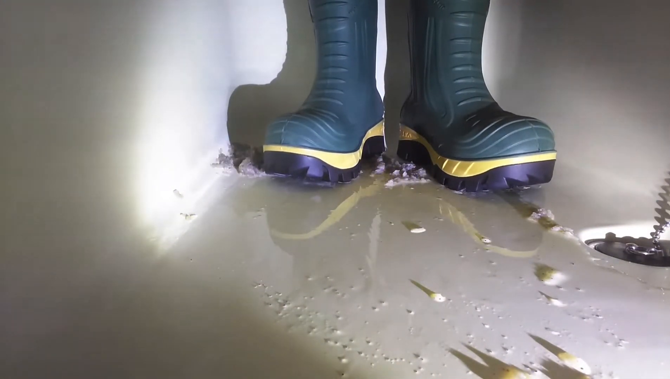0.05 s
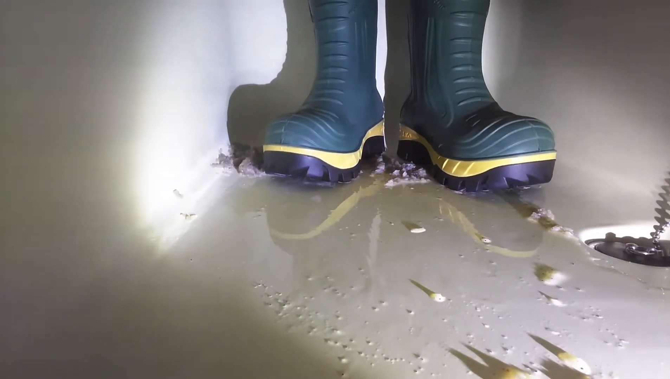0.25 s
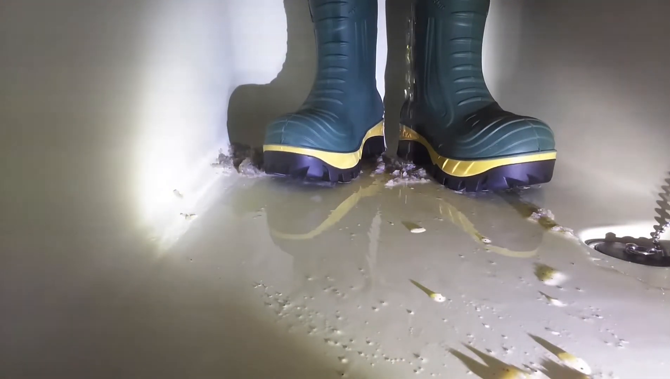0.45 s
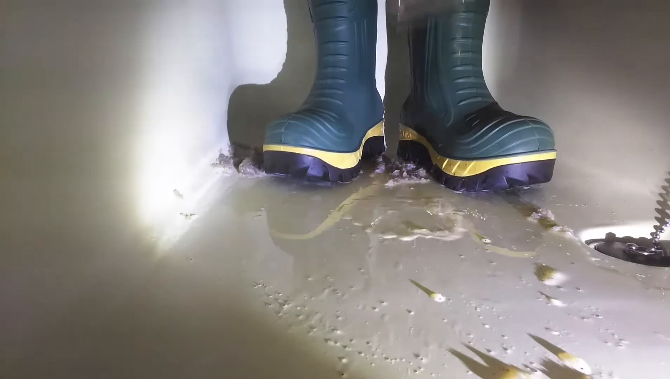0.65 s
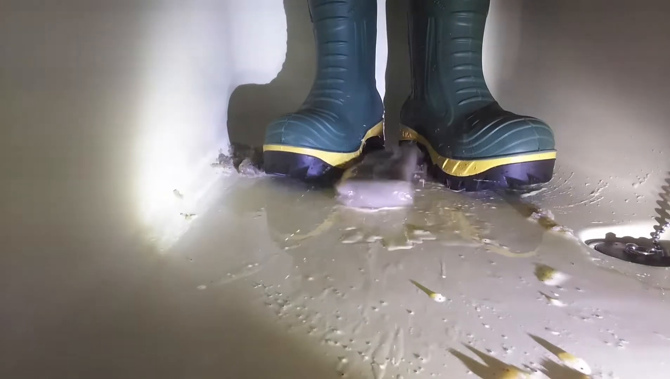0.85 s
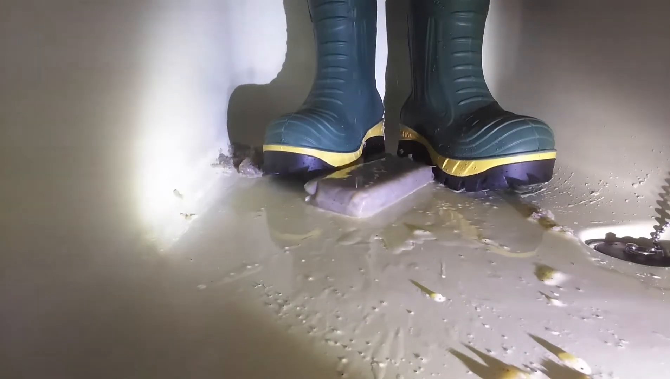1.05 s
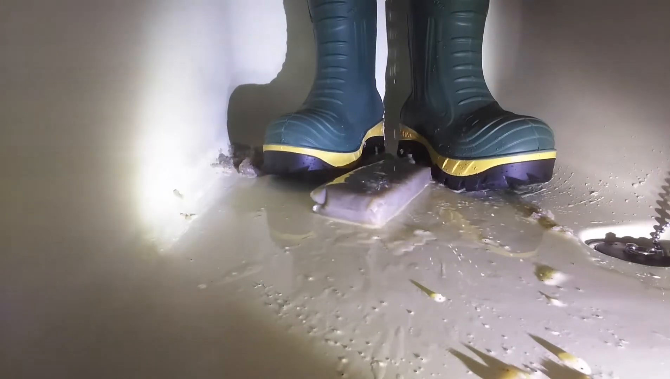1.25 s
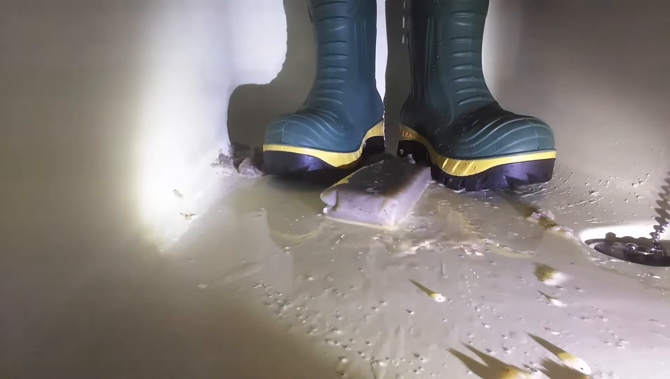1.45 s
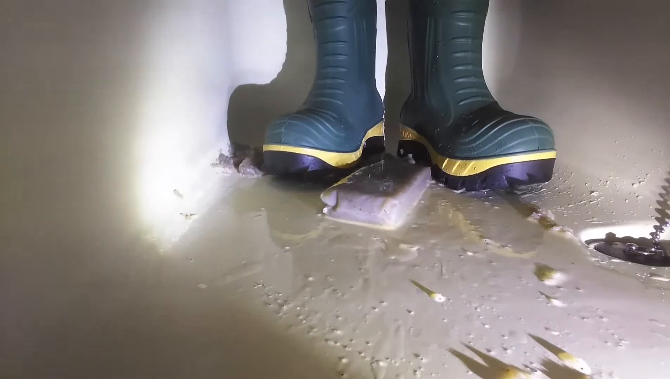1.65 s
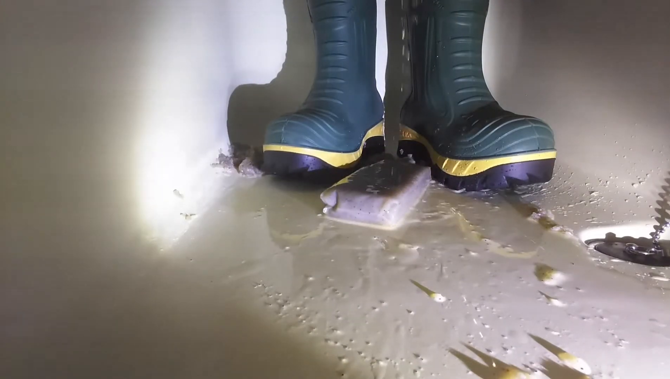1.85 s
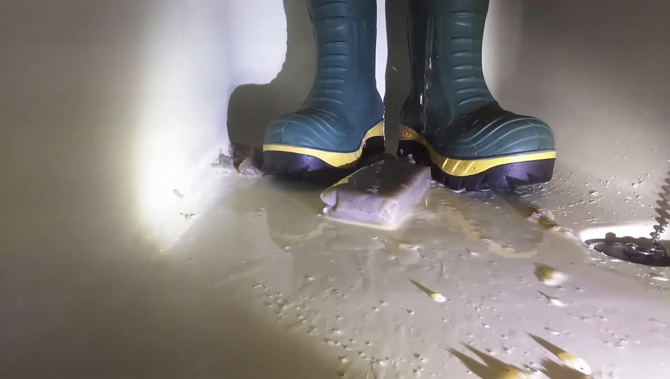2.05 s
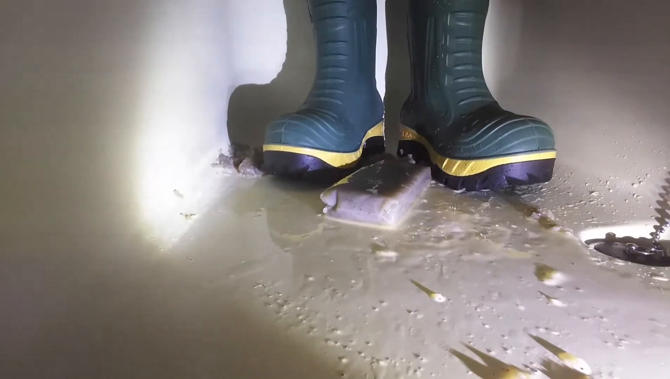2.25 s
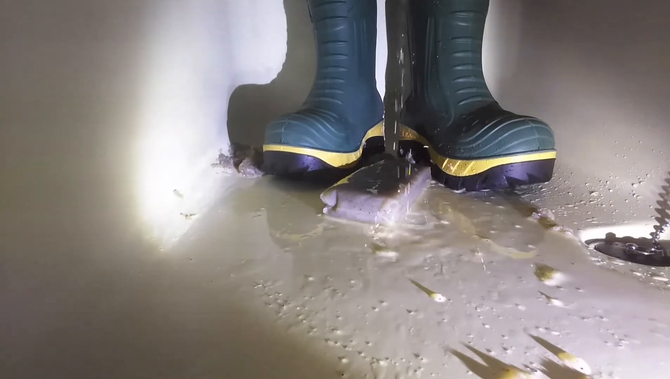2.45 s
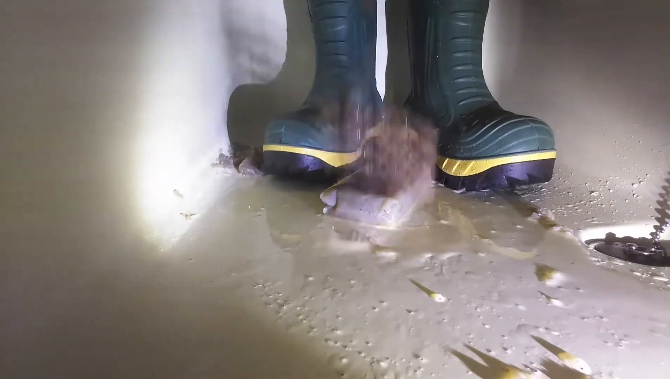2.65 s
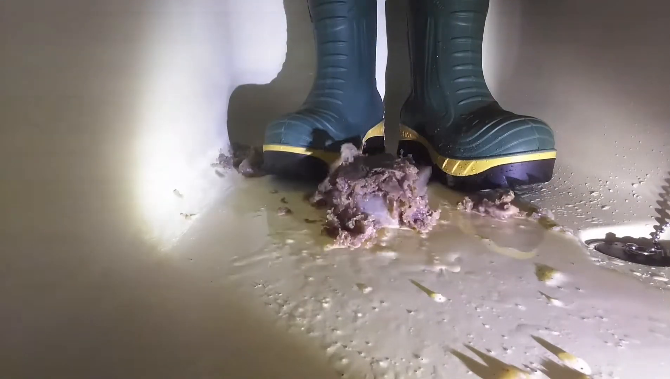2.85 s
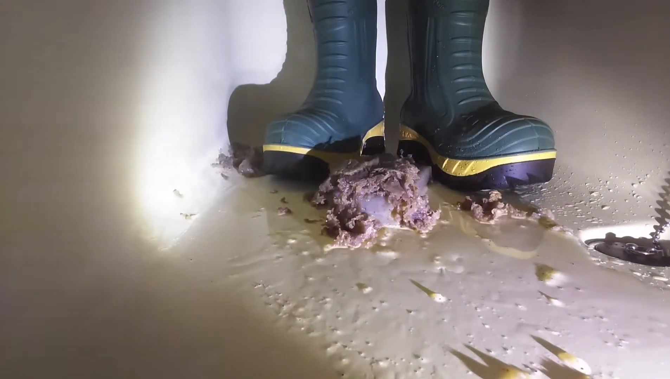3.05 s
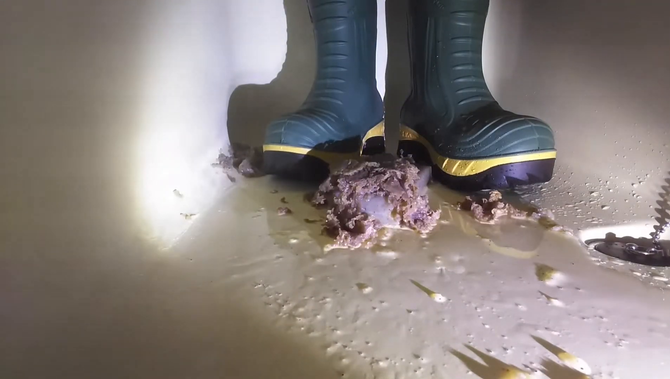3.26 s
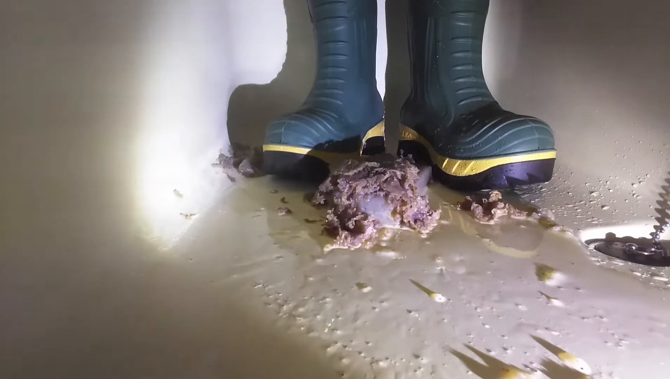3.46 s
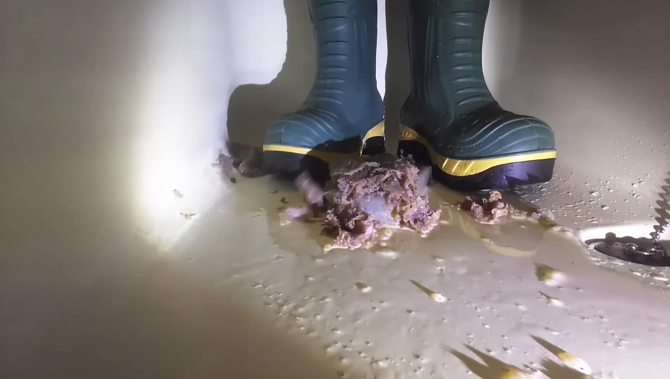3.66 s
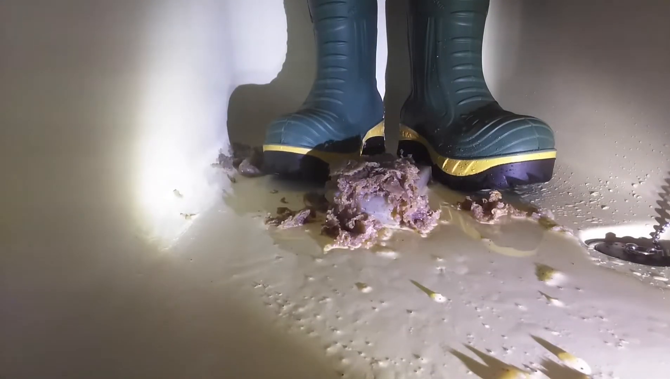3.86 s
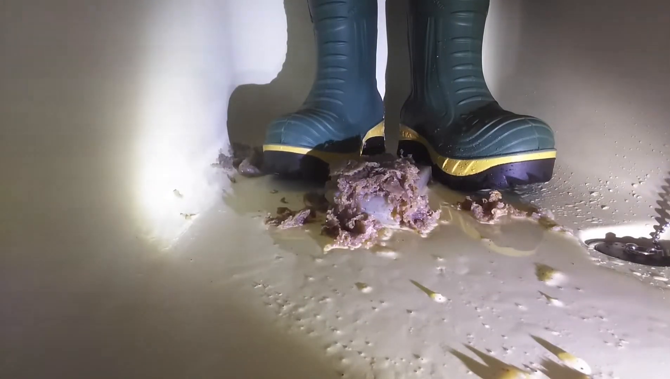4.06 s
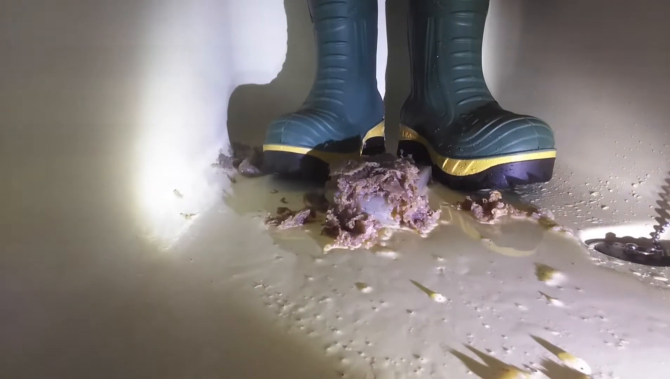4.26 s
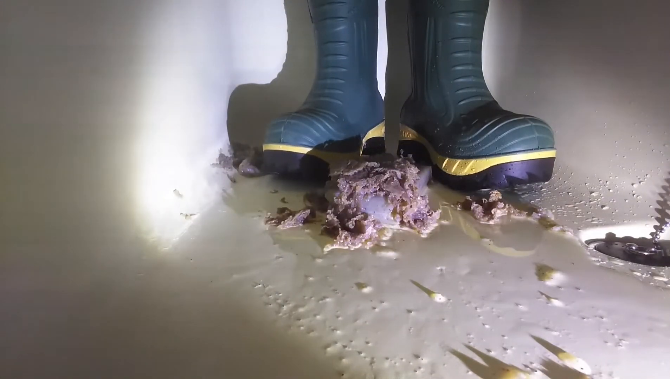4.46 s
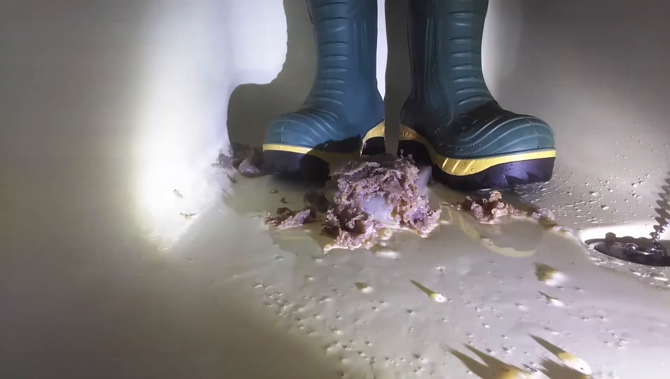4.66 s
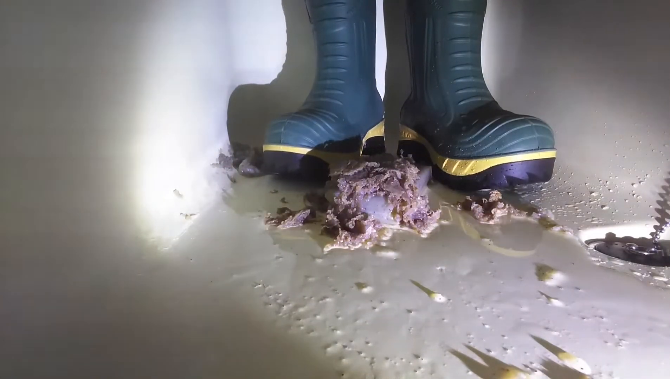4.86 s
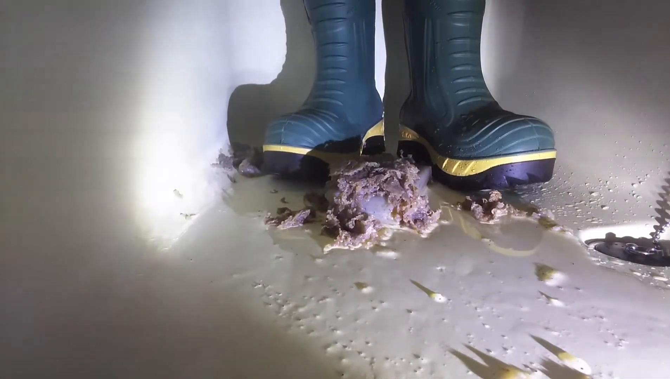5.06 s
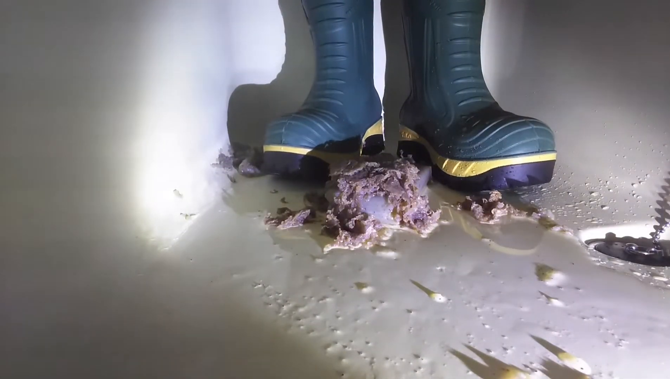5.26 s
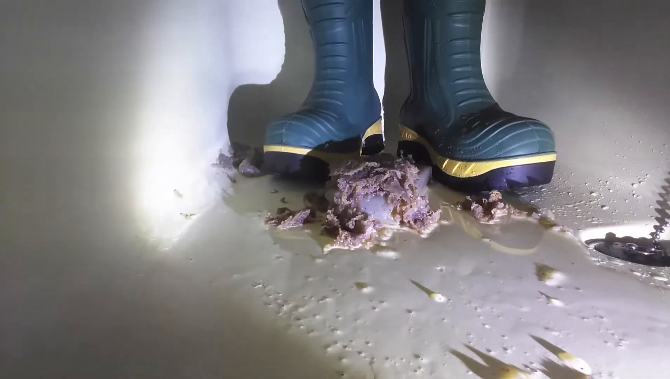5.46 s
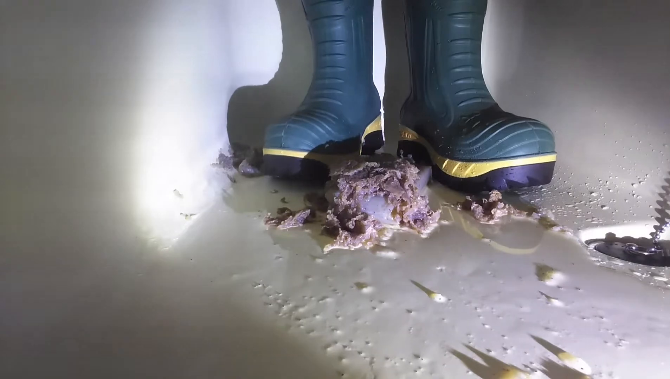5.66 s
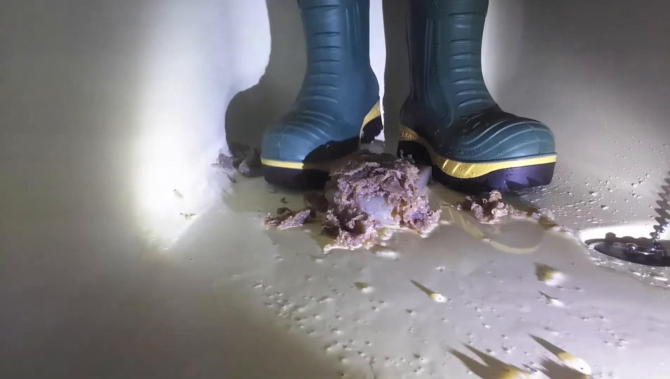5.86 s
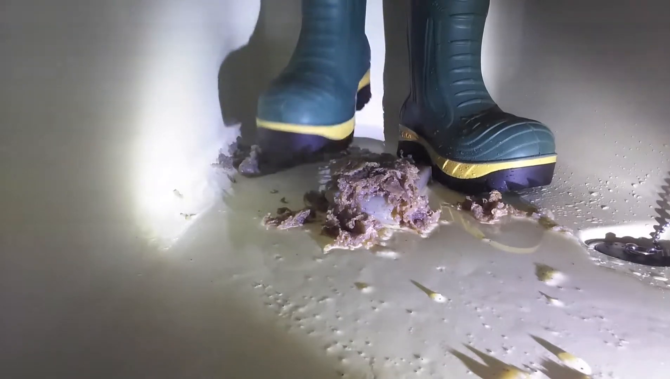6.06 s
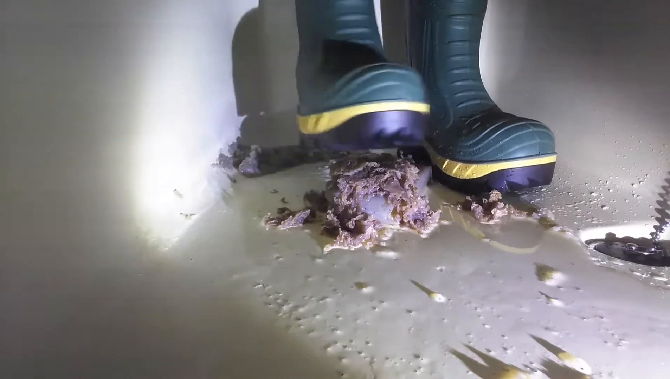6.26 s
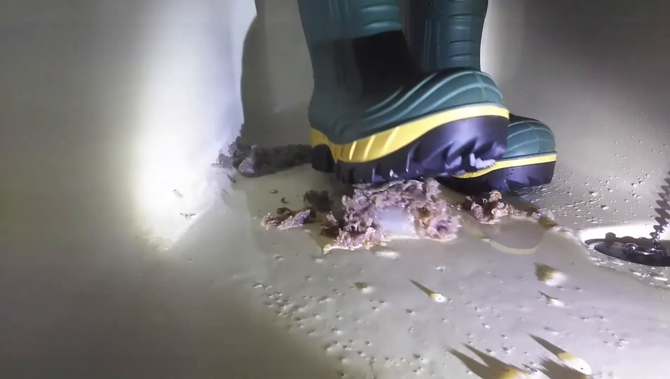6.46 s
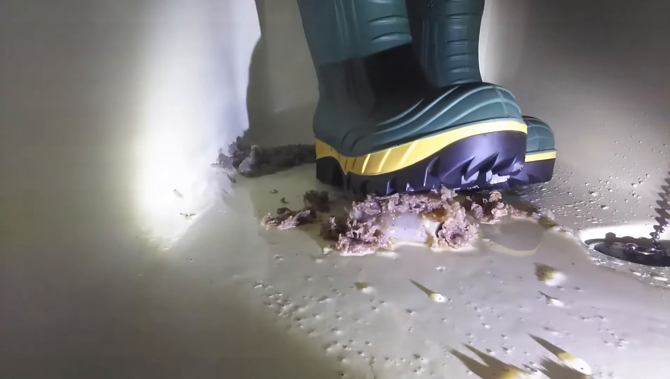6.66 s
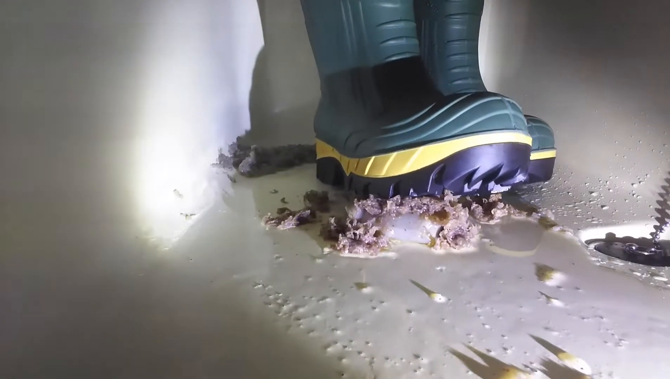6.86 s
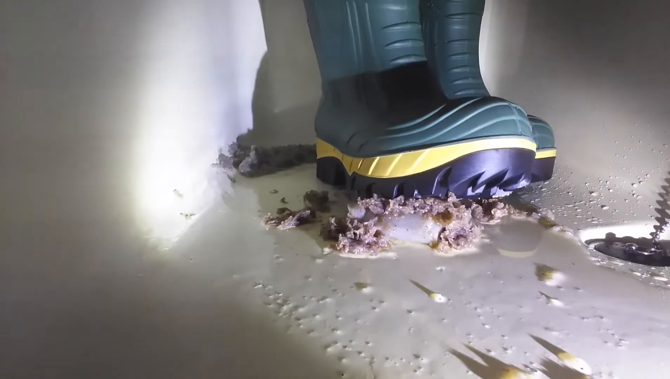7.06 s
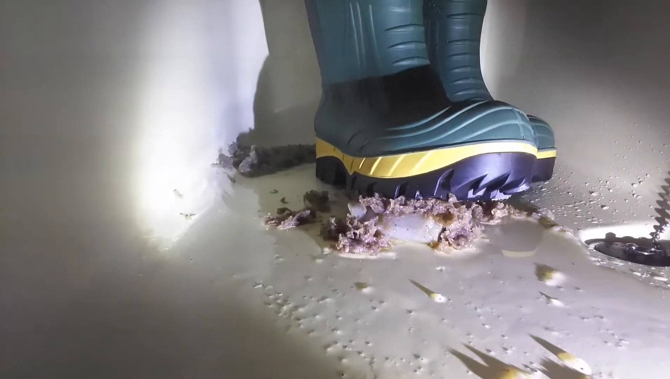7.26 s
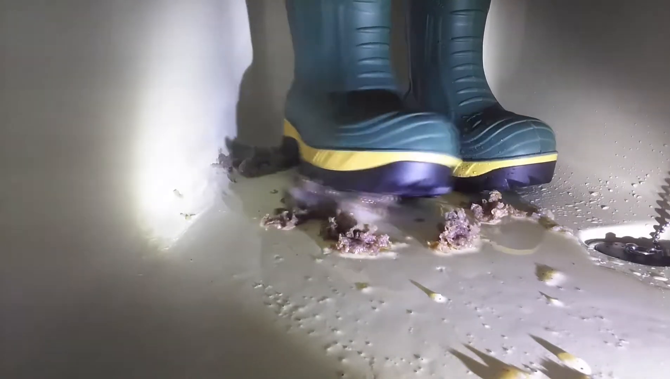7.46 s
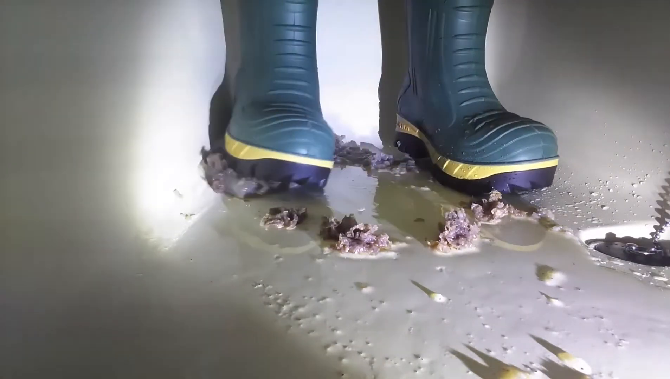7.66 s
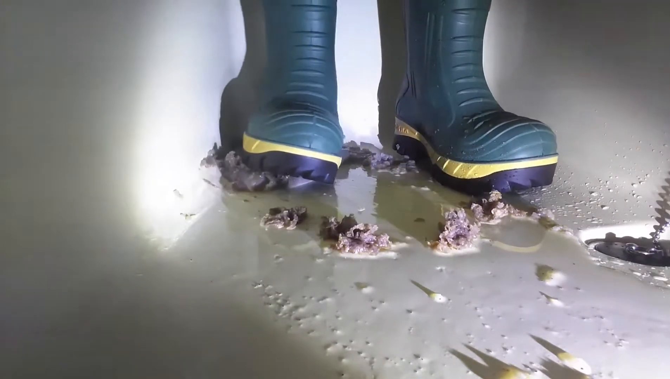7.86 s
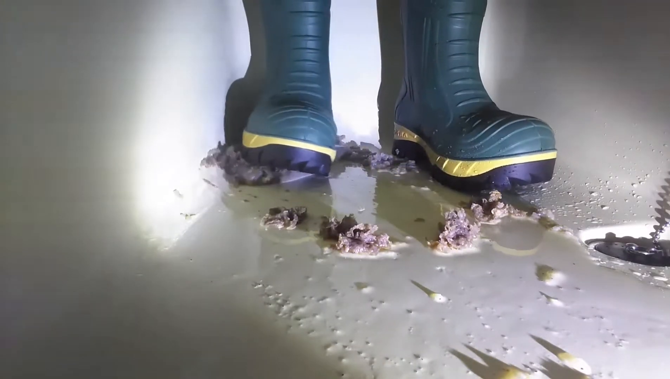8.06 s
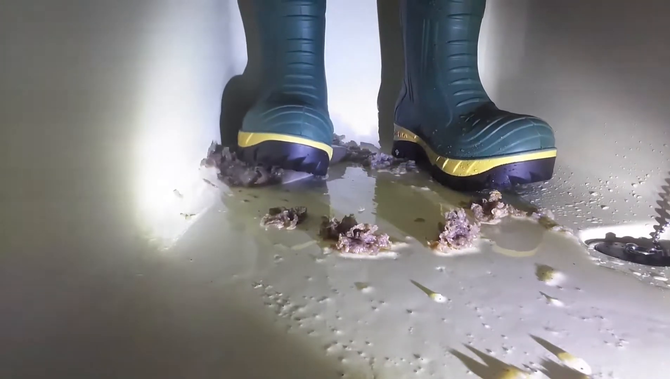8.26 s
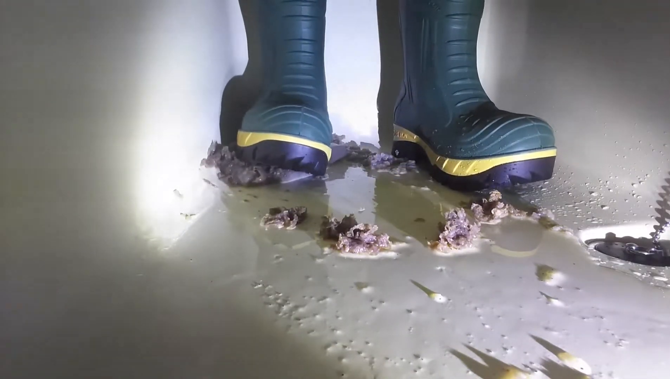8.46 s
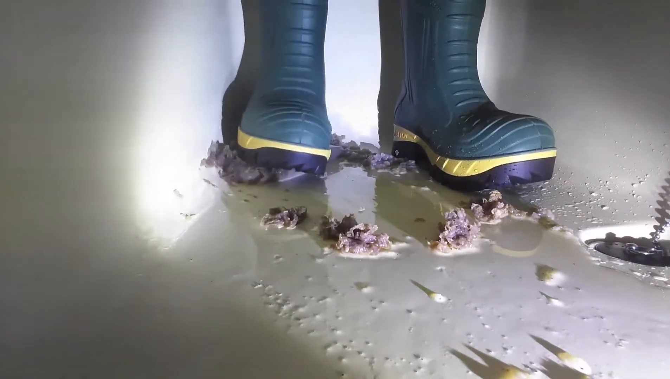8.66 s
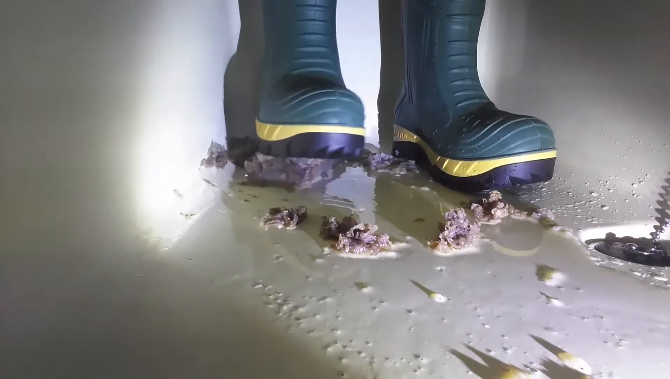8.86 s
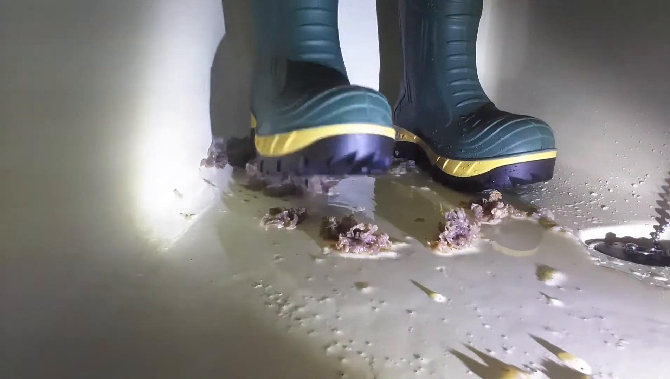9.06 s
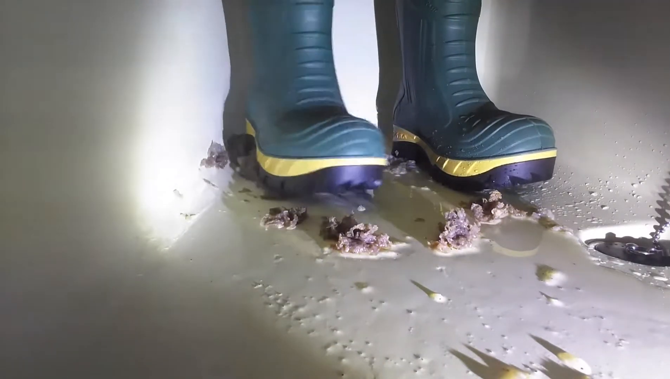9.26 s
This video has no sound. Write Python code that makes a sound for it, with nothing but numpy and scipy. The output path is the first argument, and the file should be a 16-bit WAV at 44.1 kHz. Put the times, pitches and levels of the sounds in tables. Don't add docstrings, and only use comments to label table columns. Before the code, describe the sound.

A small stereo camera microphone hears wet food falling into a bathtub: juicy slap, scattered clicking drips, then another loud splat. Sparse drops follow, then thin tin clatters on the tub floor. Rubber presses into mush, air pockets gulping and popping, before the sole pulls free and lands in soft hollow steps. Short scuffs end it. Bright tile echo, quiet hum and slight hiss surround everything.

```python
import sys
import numpy as np
from scipy import signal
from scipy.fft import rfft, irfft, next_fast_len
from scipy.io import wavfile
from scipy.ndimage import uniform_filter1d, map_coordinates

SR = 44100
rng = np.random.default_rng(int(sys.argv[2]) if len(sys.argv) > 2 else 0)


def generate_wav(sig):
    pcm = np.round(np.clip(np.atleast_2d(sig).T, -1, 1) * 32767).astype(np.int16)
    wavfile.write(sys.argv[1], SR, pcm)


def attenuation_scalar(level_db):
    decades = np.asarray(level_db, float) / 20
    return 10 ** decades


N = 410571

# frequency in Hz, density in dB per Hz.
QUIET = [(26, -45), (45, -4), (129, -12.5), (202, -16), (500, -19.5), (609, -25.5), (1590, -28.5),
         (9090, -33), (16000, -32.5)]
# centre in Hz, width in Hz, level in dB.
WHINE = [(39.4, 4.7, -65), (5070, 320, -74.5)]

# frequency in Hz, density in dB per Hz.
SQUELCH = [(290, -18), (500, 0), (668, -13), (946, 0), (1320, -2), (1970, 3), (2230, -0.5), (2820, 2),
           (3350, -1), (8000, -11.5), (10400, -21), (17600, -120)]
# frequency in Hz, density in dB per Hz.
FIZZ = [(1760, -19), (3000, -20), (3870, -5.5), (7430, -7.5), (9520, -10.5), (11200, -15.5), (14800, -14),
        (15500, -39.5)]
# frequency in Hz, density in dB per Hz.
RUMBLE = [(21, -47), (35, -5), (65, -13), (102, 9), (140, -11.5), (179, -4.5), (276, -5.5), (415, -12.5),
          (540, -21.5), (900, -19), (1170, -22), (1980, -120)]
# peak in seconds, squelch in dB, swell in seconds per 20 dB,
# fade in seconds per 20 dB, fizz over the squelch in dB.
DRIBBLES = [(.47, -51.5, 0.27, 0.49, -5), (.65, -52, 0.21, 0.77, 5), (.81, -44, 0.099, .22, -2),
            (.94, -35.5, 0.027, 0.09, 11.5), (1.1, -75, .22, 0.53, 6), (1.51, -56, 0.66, 1, -23),
            (2.19, -58, 0.12, 0.23, 8.5), (2.45, -51.5, 0.4, 0.37, -6), (2.58, -48.5, 0.33, 0.2, 1),
            (3.12, -72.5, 0.14, 0.34, 17.5), (5.21, -61, 0.51, 0.94, 3)]
# peak in seconds, squelch in dB,
# swell in seconds per 20 dB, fade in seconds per 20 dB, fizz over the squelch in dB.
SQUEEZES = [(5.952, -54.5, 0.25, 0.022, 2), (6.034, -26.5, 0.019, 0.067, -36),
            (6.19, -51.5, 0.72, 0.15, -1), (6.38, -63.5, 0.026, 0.5, 14), (6.57, -31.5, 0.11, 0.2, -5),
            (6.72, -42.5, 0.12, 1, -5), (7.02, -49, 0.96, 1, -3), (7.39, -58, 0.089, 0.68, 8),
            (7.51, -36.5, 0.18, 0.13, -20), (7.64, -41.5, 0.19, 0.23, -10), (7.74, -40.5, 0.45, 0.016, 2),
            (7.898, -62.5, 0.042, 0.089, 14), (8.15, -56.5, 0.25, 0.87, 2), (8.804, -41.5, 0.15, 0.23, 2),
            (9.0, -79, 0.27, 0.86, 23), (9.25, -38, 0.21, 0.33, -3)]
# peak in seconds, rumble in dB, swell and fade in seconds per 20 dB.
SHIFTS = [(.62, -41.5, 0.051, 0.5), (0.811, -19.5, 0.039, 0.22), (0.948, -29.5, 0.3, 0.22),
          (1.3, -53, .45, .3), (1.8, -49.5, 0.83, 1.3), (2.25, -62, 0.81, 1.5), (2.45, -39.5, 0.46, 0.087),
          (5.0, -65, .03, 0.089), (5.25, -58.5, 0.16, 7.9), (5.97, -48.5, 0.1, 0.42), (6.33, -54, 0.2, 0.5),
          (6.67, -37, 0.32, 0.4), (7.161, -49.5, 0.97, 0.69), (7.63, -37, 0.23, 0.14),
          (7.89, -48.5, 0.28, 0.42), (8.38, -52, 0.29, .6), (8.752, -45, 1, 0.13), (9.23, -42.5, 0.44, 0.4)]

# start in seconds, peak in dB, bubble in Hz, dull slap in dB.
PLINKS = [(0.4851, -36, 6140, -19), (0.5125, -29.5, 4720, -22), (2.0497, -25.5, 9750, -45),
          (2.143, -32.5, 7760, -7), (2.589, -30, 9600, -11), (3.9547, -42.5, 4100, -19),
          (4.4192, -49, 9600, -4), (5.2226, -40, 4470, 0), (1.2585, -30, 6100, -4)]
# start in seconds, peak in dB, bubble in Hz, dull slap in dB.
GULPS = [(4.1545, -52, 2060, -24), (5.0498, -46.5, 2370, -26), (5.3497, -45, 2280, 1),
         (6.4894, -34, 3070, -18), (6.5033, -35, 2100, -15), (6.5697, -22.5, 2080, -17),
         (6.598, -33, 2150, -17), (6.627, -38, 2180, -14), (6.6794, -41, 2240, -15),
         (6.7293, -32, 2120, -18), (6.7677, -26, 2980, -17), (6.786, -33.5, 2100, -12),
         (6.875, -35, 2390, -15), (6.9503, -38, 2080, 5), (7.1404, -47, 2780, -16.5),
         (7.1863, -45, 2430, -25), (7.304, -38, 4100, -13), (7.349, -57, 4220, -27),
         (7.3624, -42, 2800, -14), (7.4103, -44, 2820, -10), (7.449, -38.5, 1950, -15),
         (7.4986, -28.5, 1950, -24.5), (7.515, -41, 1920, -5), (7.565, -39, 3200, -17),
         (8.6254, -49.5, 1770, -15), (9.2011, -32.5, 3220, -4)]
# start in seconds, peak in dB, bubble in Hz, dull slap in dB.
SPITS = [(0.4449, -45, 3500, -11), (1.1533, -35.5, 10500, -16), (1.838, -41, 9140, -19),
         (1.8658, -34, 9050, -11), (2.2079, -41, 2080, 7), (2.2284, -28.5, 10500, -10),
         (3.2522, -48, 3990, -34), (3.5272, -51.5, 3800, 1), (1.251, -46, 5500, -15),
         (1.421, -32, 3500, -6), (5.06, -46.5, 11000, -18), (5.352, -40, 5000, 0), (6.355, -47, 10500, -20),
         (8.1055, -50.5, 2700, 14), (8.2636, -46, 3800, 1), (8.4392, -45.5, 1320, 3)]
# start in seconds, peak in dB, bubble in Hz, dull slap in dB.
SPLATS = [(0.5687, -33, 3060, 2), (0.709, -21, 9500, -9.5), (0.7974, -14, 9000, -31),
          (0.8064, -20, 3200, -4), (0.8174, -15, 5270, -3.5), (0.8344, -40, 2470, 2),
          (1.9739, -32, 8400, -6), (1.9869, -30, 8500, -35), (2.7585, -6, 4240, -62),
          (3.6622, -48.5, 3640, 2), (3.683, -32, 7700, -7), (4.4447, -55, 5140, 7)]
# start in seconds, peak in dB, bubble in Hz, dull slap in dB.
SMACKS = [(0.9484, -17.5, 2640, -7.5), (6.3032, -56, 3120, 16), (6.7667, -27, 2200, 0.5),
          (6.8535, -23, 2780, -1.5), (6.8852, -25.5, 2670, -18), (6.99, -23, 2780, -12),
          (7.066, -25.5, 2830, -22), (7.0801, -20, 3730, -8.5), (7.3058, -37, 5380, -28.5),
          (6.5425, -32, 2400, -16), (6.9673, -34, 2590, -15), (7.188, -43, 5000, -20),
          (7.5049, -30, 2800, -3), (7.7423, -26.5, 910, 0)]
# start in seconds, peak in dB, bubble in Hz, dull slap in dB.
TICKS = [(1.27, -34.5, 9000, 0.5), (2.2979, -20, 7600, -22), (2.4346, -28, 4220, 0),
         (2.5437, -29.5, 6950, -7)]
# start in seconds, peak in dB, bubble in Hz, dull slap in dB.
CLACKS = [(0.5135, -46, 5160, -18), (1.4345, -10, 3900, -25), (1.608, -17, 9270, -31),
          (9.2641, -18.5, 4030, -14), (9.271, -37, 4700, -20)]
# its drops, bubble life in cycles, splash share of the peak,
# spray in dB, splash t60 in seconds, echo in dB.
DROP_KINDS = [
    (PLINKS, 21, 0.43, -21.5, 0.031, 0.1),
    (GULPS, 9.8, 0.14, -22, 0.036, -0.9),
    (SPITS, 2.6, 0.2, -11, 0.027, 0.1),
    (SPLATS, 3.26, 0.44, -16.5, 0.035, 0.1),
    (SMACKS, 2.3, 0.51, -22, 0.0084, -2),
    (TICKS, 7.3, 0.77, -9.5, 0.026, -1),
    (CLACKS, 4.4, 0.26, -32, 0.054, -1.2)]

# frequency in Hz, level in dB, t60 in seconds.
TUB = [
    [(98, -3, 0.21), (101.2, 5, 0.46), (120.6, -6, 0.52)],
    [(168.7, -11, 0.3), (180.6, 3, 0.35), (201.2, 1.5, 0.14), (217, -5.5, 0.47)],
    [(263, -5.5, 0.14), (263.5, -3.5, 0.68), (289.6, -8, 0.54), (323.9, -6, 0.5), (346, 3.5, 0.1),
     (394.4, -1, 0.38), (415.4, -3, 0.28), (474, -6.5, 0.51), (563, -6, 0.25)],
]
# start in seconds, strength in dB,
# nearness to the middle in dB, slap in dB.
FALLS = [(0.573, -29.5, -2.5, -6), (0.619, -34.5, -4.5, -14), (0.802, -20, 9.5, -5.5), (0.949, -24, 0, 4.5),
         (1.269, -41, 4, -8), (1.431, -42, -3, -33), (1.504, -37.5, 3, -0.5), (1.62, -46.5, -5, -1),
         (1.848, -47, -1, -4), (1.99, -41.5, 5, -30), (2.138, -38.5, 1.5, -3.5), (2.211, -39, -5.5, 3),
         (2.433, -34.5, 3.5, -4), (2.545, -38.5, -1.5, 0.5), (2.759, -19.5, 2.5, -6), (3.523, -59, -4, 5),
         (3.686, -51.5, 4, 0.5), (4.305, -49, -1.5, -8), (5.57, -37, -4.5, 3), (6.037, -50, -12, -15),
         (6.22, -42, -7.5, 7), (6.28, -48, -10, 14), (7.741, -42.5, -7, 7.5)]
# start in seconds, low drum in dB, second drum over it in dB,
# wall ring over it in dB.
STEPS = [(5.975, -35.5, -1, -7), (6.542, -40, 10, 3), (6.624, -26.5, 3.5, -10), (6.671, -53, -5, -4),
         (6.991, -47.5, 3, -2), (7.463, -36.5, -1, 1.5), (7.509, -37.5, -4, -10), (7.744, -22, -3, -8.5),
         (8.113, -25, -12, -15.5), (8.368, -27, -11, -20.5), (8.45, -40.5, -0.5, -13), (8.71, -50, -4, 5),
         (8.83, -47, -17, -24), (8.9, -44.5, -23, -29), (8.999, -50.5, -13, -17), (9.09, -46, -3, -16),
         (9.199, -42, -5, -12)]

# start in
# seconds, peak in dB, brightness in dB, # fade t60 in seconds.
SCUFFS = [(0.782, -31.5, -5, 0.79), (6.5396, -30.5, -2, 0.13), (7.46, -28, -17, 0.11),
          (8.7063, -21.5, -2.5, 0.028), (9.074, -22.5, 0, 0.017), (9.176, -34.5, 0, 0.21)]

# start in seconds, peak in dB, crack in dB.
TIN_HITS = [(5.548, -31.5, -10.5), (5.557, -25.5, -20), (5.576, -34.5, -15.5), (5.586, -38, -26),
            (5.607, -30, -19), (6.024, -30, -27), (6.033, -23, -30), (6.047, -29, -19.5),
            (6.223, -36.5, -26), (6.277, -56, -22), (6.307, -43.5, -30), (6.371, -55, -12),
            (6.426, -48.5, -17)]
# frequency in Hz, level in dB, t60 in seconds.
TIN_BASE = [(317, -5.5, 0.91), (894, -4, 0.71), (1120, 3.5, 0.26), (1330, 8, 0.23), (1490, 7, 0.27),
            (1798, 7, 0.21), (2530, 6, 0.29), (2800, 3, 0.38), (3110, 16, 0.19), (3200, 21, 0.17),
            (3660, 14.5, 0.13), (4740, 14, 0.24), (5077, 9, 0.19), (9060, 1, 0.048)]
# frequency in Hz, level in dB, t60 in seconds.
TIN_SIDE = [(325, -4.5, 0.95), (395, 5, 0.18), (465, 12.5, 0.061), (540, -10, 0.22), (768, -1.5, 0.54),
            (980, -11, 0.6), (1247, 3, 0.17), (1335, -1, 0.18), (1394, 12, 0.073), (1460, 4, 0.071),
            (1830, -17, .1), (3180, 5.5, 0.069), (3580, 0.5, 0.087), (5180, 0.5, 0.12)]
# centre in Hz, width in Hz, depth in dB.
HOLLOW = (630, 130, -11)

# start in seconds, length in seconds, pitch in Hz, level in dB.
CREAKS = [(8.38, .2, 1830, -70), (8.43, .08, 1100, -60), (8.2, .06, 1050, -64), (7.9, .06, 980, -62)]

# frequency in Hz, t60 in seconds.
TILES = [(60, 0.5), (300, 0.65), (1000, 0.61), (3000, 0.39), (8000, 0.38), (14000, 0.22)]
# frequency in Hz,
# correlation from -1 to 1.
ALIKE = [(280, 0.96), (400, -0.16), (620, -0.13), (780, 0.74), (980, 0.19), (1300, 0.03), (2100, -0.28),
         (3500, 0.0089)]
# frequency in Hz, left minus right in dB.
LEAN = [(60, 1), (130, 0.5), (290, 2), (640, 3.5), (1410, 0), (3100, 1), (6820, -3), (15000, -3)]
# frequency in Hz, phase in radians.
TURN = [(300, 0.05), (520, 2.13), (760, .05), (1000, .05), (1350, 1.63), (2100, 1), (4000, 0.89),
        (14000, 1.84)]
# centre in Hz, width in Hz, height in dB.
PORT = (9040, 940, 7.26)


def unit(x):
    return x / np.sqrt(np.mean(x ** 2) + 1e-20)


def along(points, hz):
    f, v = np.transpose(points)
    return np.interp(np.log(hz + 1), np.log(f + 1), v)


def bell(hz, centre, width):
    return 1 / (1 + (2 * (hz - centre) / width) ** 2)


def filtered(x, response):
    m = next_fast_len(x.shape[-1] + 8192)
    spectrum = rfft(x, m) * response(np.fft.rfftfreq(m, 1 / SR))
    return irfft(spectrum, m)[..., :x.shape[-1]]


def spread(pair):
    def mid_side(hz):
        angle = np.arccos(np.clip(along(ALIKE, hz), -1, 1)) / 2
        return np.array([np.cos(angle), np.sin(angle)])

    mid, side = filtered(pair, mid_side)
    return np.array([mid + side, mid - side])


def add(bus, s, sound):
    start = round(s * SR)
    bus[start:start + len(sound)] += sound[:N - start]


def puff(t, lo_hz, hi_hz, t60, snap=0):
    band = signal.butter(3, [lo_hz, hi_hz], "band", fs=SR, output="sos")
    noise = signal.sosfilt(band, rng.standard_normal(len(t)))
    click = signal.sosfilt(band, signal.unit_impulse(len(t)))
    return unit(noise) * attenuation_scalar(-60 * t / t60) + snap * click / np.abs(click).max()


def ring(modes, t, scatter_db, attack, blur, count):
    hz, db, t60 = np.transpose(modes)[:, :, None, None]
    chance = rng.standard_normal((2, len(modes), count, 1))
    place = np.arange(count)[:, None] - (count - 1) / 2
    pitch = hz * (1 + blur * (place + 0.31 * chance[1]))
    strength = attenuation_scalar(db + scatter_db * chance[0])
    tones = (strength * np.sin(2 * np.pi * t * pitch)).sum(1)
    return (tones * attenuation_scalar(-60 * t / t60[:, 0])).sum(0) * (1 - np.exp(-t / attack))


def quiet():
    air = spread(rng.standard_normal((2, N)))
    bands = 0
    for hz, width, db in WHINE:
        bands = bands + attenuation_scalar(db) * unit(filtered(air, lambda f: bell(f, hz, width)))
    return attenuation_scalar(-55) * unit(filtered(air, lambda hz: attenuation_scalar(along(QUIET, hz)))) + bands


def swell(s, db, rise, fall):
    s, db, rise, fall = [np.reshape(column, (-1, 1)) for column in (s, db, rise, fall)]
    late = np.arange(0, N + 64, 64) / SR - s
    drop_db = 20 * np.maximum(-late / rise, late / fall)
    power = (attenuation_scalar(db - drop_db) ** 2).sum(0)
    return np.interp(np.arange(N) / 64, np.arange(len(power)), np.sqrt(power))


def patchy(x, depth_db):
    z = signal.stft(x, nperseg=512)[2]
    field = uniform_filter1d(rng.standard_normal(z.shape[1:]), size=6, axis=0)
    field = uniform_filter1d(field, size=4, axis=1)
    return unit(signal.istft(z * attenuation_scalar(depth_db * unit(field)), nperseg=512)[1][:, :N])


def crackle(spectrum, rate, spike_db, share):
    size_db = spike_db * np.minimum(rng.exponential(size=N), 2.5)
    pops = (rng.random(N) < rate / SR) * attenuation_scalar(size_db) * rng.choice([-1, 1], N)
    lumps = map_coordinates(rng.standard_normal(600), [np.arange(N) * 60 / SR])
    clumps = attenuation_scalar(2.76 * np.clip(lumps, -2, 1.5))
    mix = share * unit(pops) + unit(clumps) * rng.standard_normal((2, N))
    mix = patchy(mix, depth_db=3.5)
    return unit(filtered(mix, lambda hz: attenuation_scalar(along(spectrum, hz))))


def mush():
    s, db, rise, fall, fizz_db = np.transpose(DRIBBLES + SQUEEZES)
    squelch = swell(s, db, rise, fall) * crackle(SQUELCH, 320, spike_db=6, share=0.9)
    fizz = swell(s, db + fizz_db - 1, rise, fall) * crackle(FIZZ, 1900, spike_db=6, share=0.2)
    rumble = spread(crackle(RUMBLE, 60, spike_db=3, share=0.35))
    return spread(squelch + fizz) + swell(*np.transpose(SHIFTS)) * rumble


def scattered(sound):
    bins = max(round(500 * len(sound) / SR), 1)
    colour = np.sqrt(np.abs(uniform_filter1d(np.abs(rfft(sound)) ** 2, bins)))
    return np.roll(irfft(colour, len(sound)), 100)[:200]


def drop(t, hz, slap_db, cycles, splash, spray_db, fade):
    cycles = max(cycles, 1)
    life = cycles / hz
    rising = 0.928 + 0.026 * np.minimum(t / life, 3)
    envelope = 0.86 * np.exp(-t / life) * (1 - np.exp(-t / (0.11 * life)))
    bubble = envelope * np.sin(2 * np.pi * hz * t * rising)
    wide = 1.176 + 3 / cycles
    wet = splash * puff(t, hz / wide, min(hz * wide, 15000), fade, snap=1.2)
    slap = attenuation_scalar(slap_db - 16.5) * puff(t, 480, 3300, 0.16, snap=0.29)
    spray = attenuation_scalar(spray_db + 3.0) * puff(t, 9000, 15000, 1.15 * fade, snap=1.9)
    return bubble + wet + slap + spray


def drops(spots=3):
    near, walls, t = np.zeros(N), np.zeros((spots, N)), np.arange(SR // 20) / SR
    every = sorted((*row, *kind) for rows, *kind in DROP_KINDS for row in rows)
    for k, (s, db, *settings, echo_db) in enumerate(every):
        sound = attenuation_scalar(db + 4.5) * drop(t, *settings)
        add(near, s, sound)
        add(walls[k % spots], s, attenuation_scalar(echo_db) * scattered(sound))
    return near, walls


def tub():
    bus, t = np.zeros(N), np.arange(SR // 2) / SR
    blows = []
    for s, db, near, slap in FALLS:
        low_db, wall_db = db - 11 + near, db - 2.5 - 0.95 * near
        blows.append((s, low_db, db, wall_db, db + slap, 0, 0.002))
    for s, db, mid, wall in STEPS:
        blows.append((s, db, db + mid, db + wall, db + wall - 4, 5.5, 0.0054))
    for s, low_db, mid_db, wall_db, slap_db, damp_db, attack in sorted(blows):
        drum = 0
        for db, modes in zip((low_db, mid_db, wall_db), TUB):
            drum = drum + attenuation_scalar(db - 4.5) * ring(modes, t, 2.8, attack, blur=0.036, count=1)
        damping = attenuation_scalar(damp_db * np.exp(-t / 0.028))
        slap = attenuation_scalar(slap_db - 4.5) * puff(t, 322, 1240, 0.22, snap=0.5)
        add(bus, s - 0.003, drum * damping + slap)
    for s, db, *_ in STEPS:
        heave = puff(t, 39.7, 73, 0.8) * (1 - np.exp(-t / 0.018))
        add(bus, s, attenuation_scalar(db - 12) * heave)
    return bus


def scuffs():
    bus, t = np.zeros(N), np.arange(SR // 3) / SR
    for s, db, bright_db, t60 in SCUFFS:
        hiss = puff(t, 1220, 5600, t60) + attenuation_scalar(bright_db) * puff(t, 4300, 13200, t60)
        add(bus, s, attenuation_scalar(db - 6.0) * hiss * (1 - np.exp(-t / 0.00091)))
    return bus


def tin():
    bus, t = np.zeros(N), np.arange(SR // 3) / SR
    for s, db, crack_db in TIN_HITS:
        upright = s < 6
        modes, top_hz, fade = (TIN_BASE, 5500, 0.28) if upright else (TIN_SIDE, 1800, 0.09)
        clatter = puff(t, 580, top_hz, fade) + 0.73 * puff(t, 1400, 16000, 0.048)
        rattle = map_coordinates(rng.standard_normal(40), [t * 90])
        metal = ring(modes, t, 1.5, 0.0014, blur=0.01434, count=5) * (0.84 + 0.51 * rattle)
        add(bus, s, attenuation_scalar(db - 19.0) * (metal + attenuation_scalar(crack_db + 36.5) * clatter))
    return filtered(bus, lambda hz: attenuation_scalar(HOLLOW[2] * bell(hz, *HOLLOW[:2])))


def creaks():
    bus = np.zeros(N)
    for s, length, hz, db in CREAKS:
        t = np.arange(round(length * SR)) / SR
        squeak = puff(t, 0.96 * hz, 1.04 * hz, 6.1)
        add(bus, s, attenuation_scalar(db) * squeak * np.sin(np.pi * t / length))
    return bus


def room(bus):
    noise = rng.standard_normal((len(bus), 2, SR * 3 // 5))
    hz, t, z = signal.stft(noise, SR, nperseg=256)
    dying = attenuation_scalar(-60 * t / along(TILES, hz)[:, None])
    tails = signal.istft(z * dying, SR, nperseg=256)[1]
    tails = np.array([spread(pair) / np.linalg.norm(pair[0]) for pair in tails])
    m = next_fast_len(N + SR)
    echo = irfft((rfft(bus, m)[:, None] * rfft(tails, m)).sum(0), m)
    return np.pad(echo, ((0, 0), (160, 0)))[:, :N]


def scene():
    drips, landings = drops()
    drum, can, squash, slide = tub(), tin(), mush(), scuffs()
    drum_to_walls = filtered(drum, lambda hz: 1 / (1 + (140 / (hz + 1)) ** 6))
    echo = room(np.vstack([
        attenuation_scalar(0.5) * landings,
        attenuation_scalar(-3.5) * drum_to_walls,
        attenuation_scalar(2.0) * can,
        attenuation_scalar(-7.5) * (squash[0] + 3.9 * slide)]))
    half = np.array([[0.5], [-0.5]])
    close = drips + creaks() + drum + can + slide
    near = filtered(close, lambda hz: np.exp(1j * half * along(TURN, hz)))

    def ports(hz):
        return attenuation_scalar(half * along(LEAN, hz) + PORT[2] * bell(hz, *PORT[:2]))

    return filtered(near + echo + squash, ports) + quiet()


def band_limit(x):
    return signal.sosfilt(signal.butter(12, 16500, fs=SR, output="sos"), x)


def record(dry):
    soft = dry / (1 + np.abs(dry / 0.62) ** 4) ** (1 / 4)
    hz_points = [22, 38, 10500, 12500, 15100, 16500]
    gain_db = [-15, 0.0, -6.0, -15.0, -15.0, -30]
    limited = filtered(soft, lambda hz: attenuation_scalar(np.interp(hz, hz_points, gain_db)))
    return band_limit(limited)


dry = scene()
out = record(dry)
generate_wav(out)
```